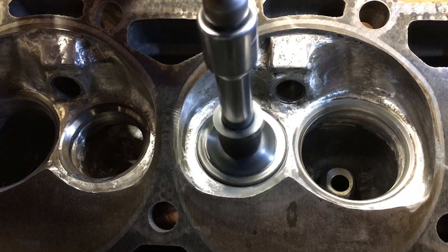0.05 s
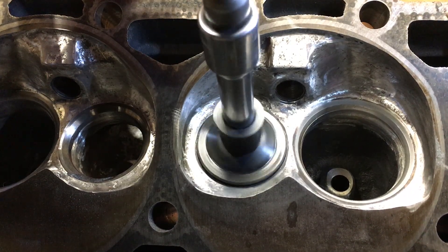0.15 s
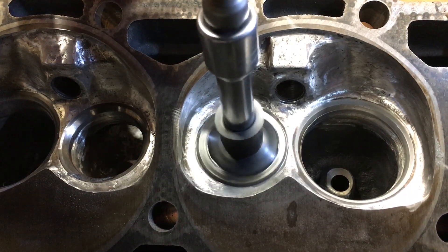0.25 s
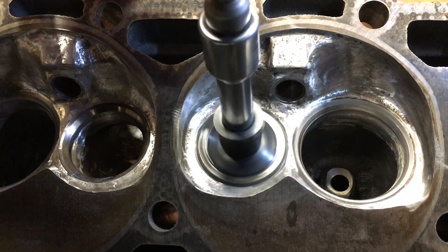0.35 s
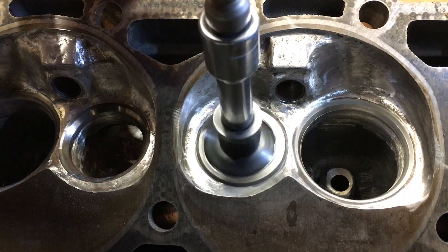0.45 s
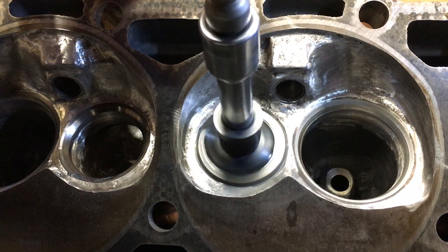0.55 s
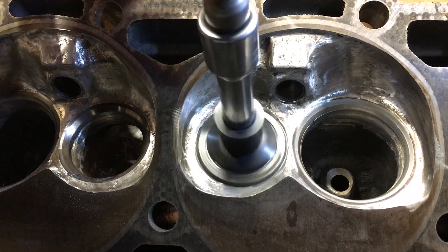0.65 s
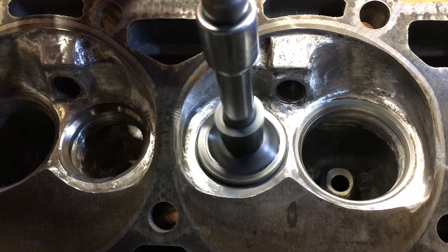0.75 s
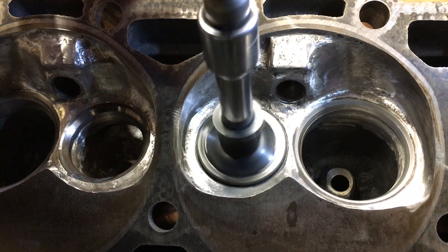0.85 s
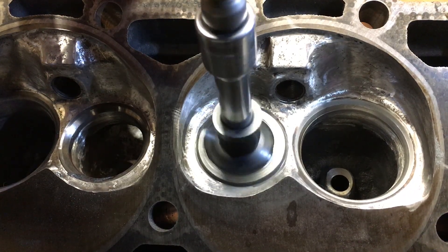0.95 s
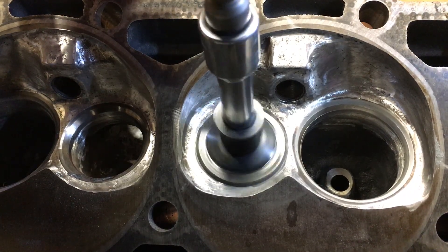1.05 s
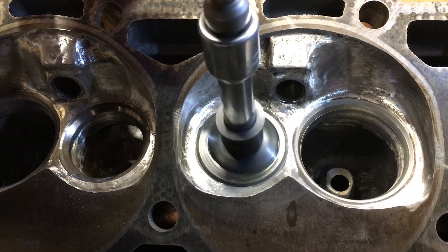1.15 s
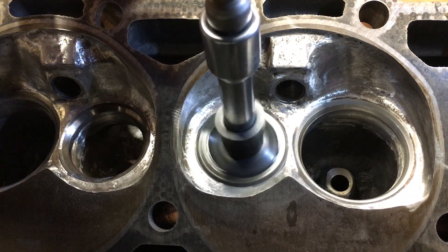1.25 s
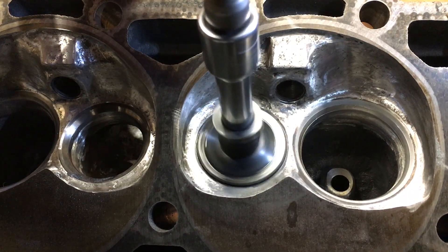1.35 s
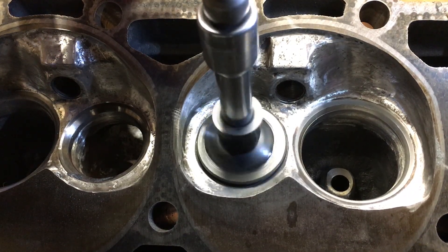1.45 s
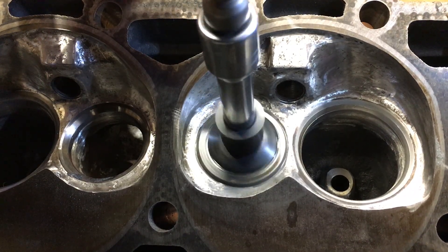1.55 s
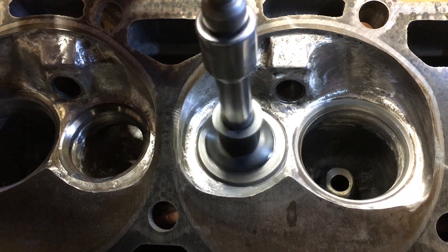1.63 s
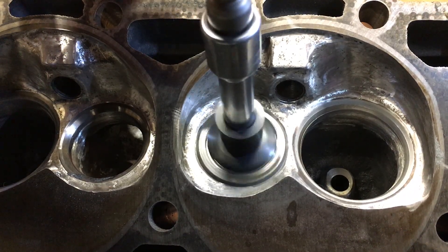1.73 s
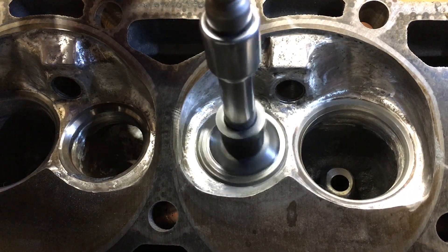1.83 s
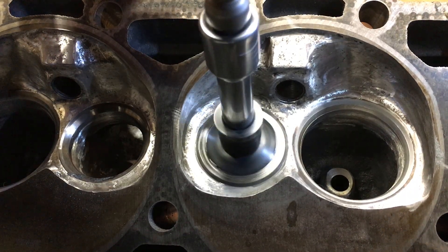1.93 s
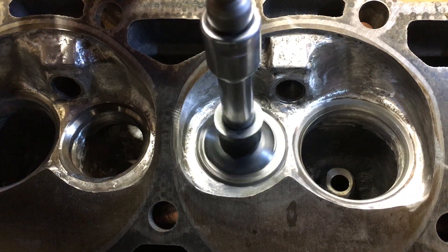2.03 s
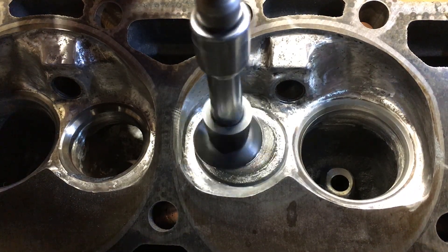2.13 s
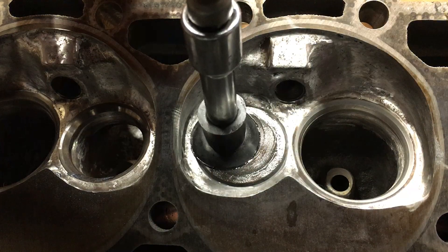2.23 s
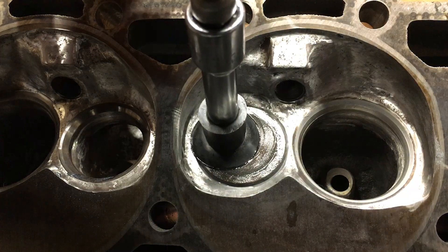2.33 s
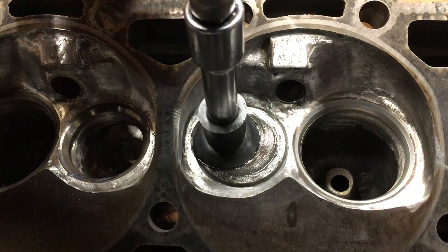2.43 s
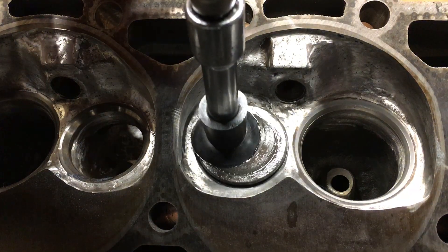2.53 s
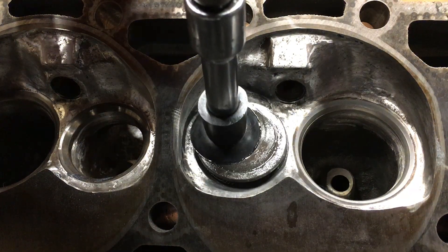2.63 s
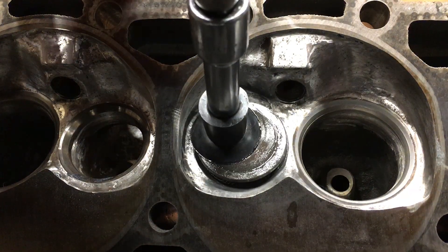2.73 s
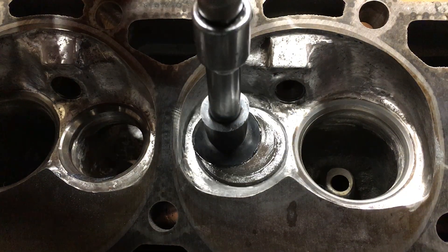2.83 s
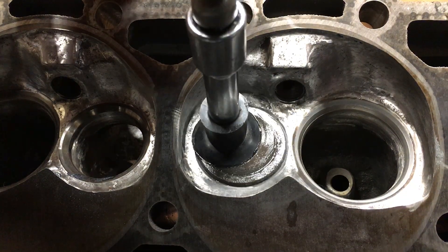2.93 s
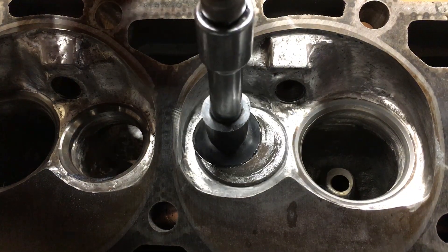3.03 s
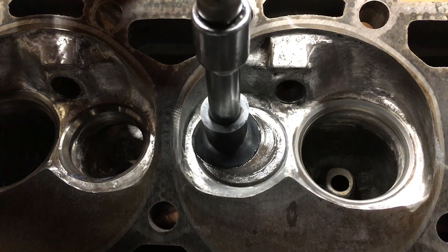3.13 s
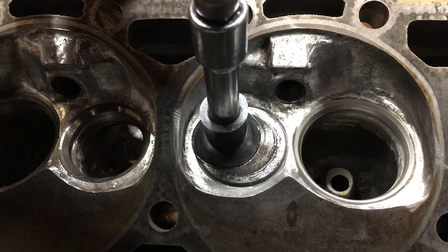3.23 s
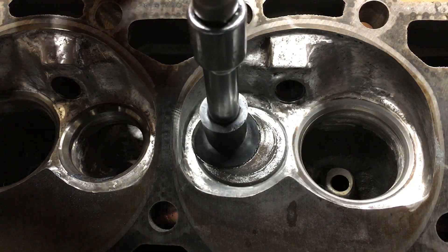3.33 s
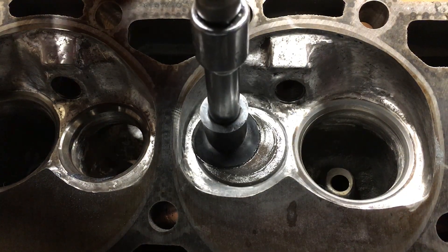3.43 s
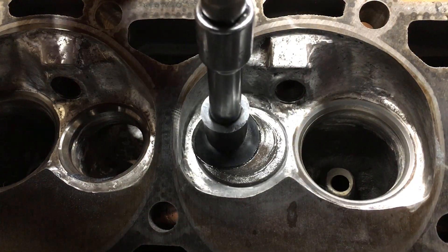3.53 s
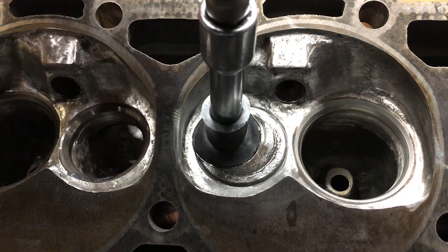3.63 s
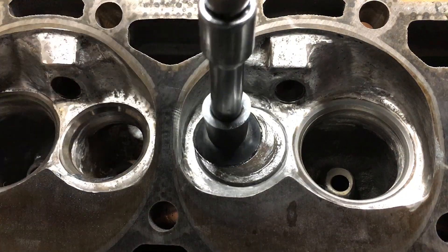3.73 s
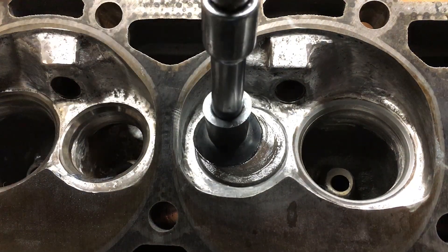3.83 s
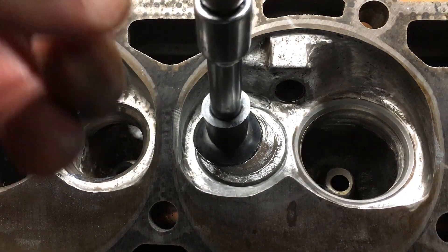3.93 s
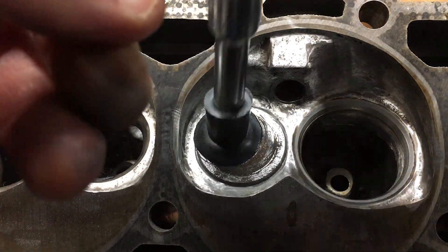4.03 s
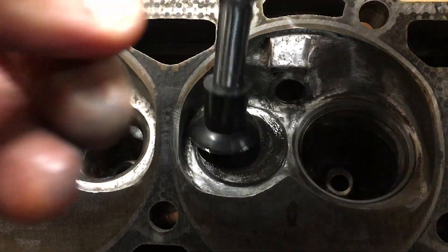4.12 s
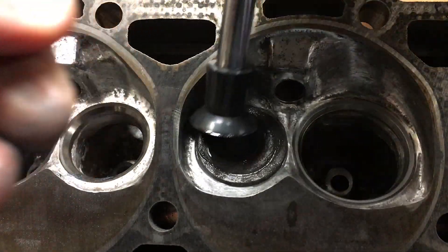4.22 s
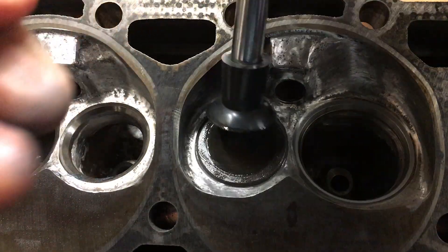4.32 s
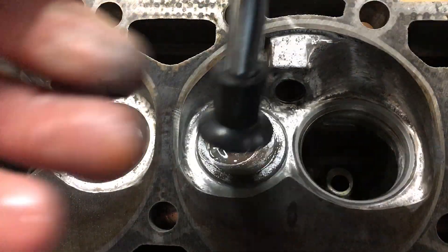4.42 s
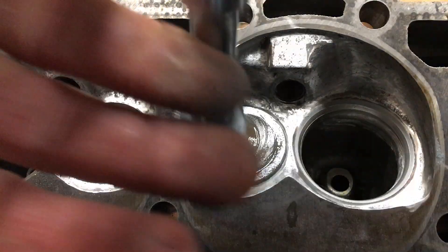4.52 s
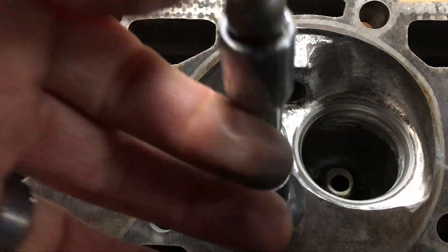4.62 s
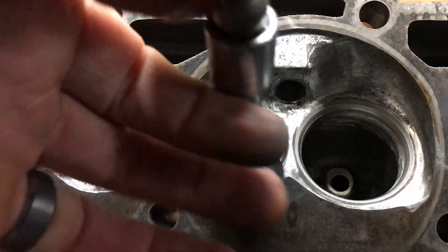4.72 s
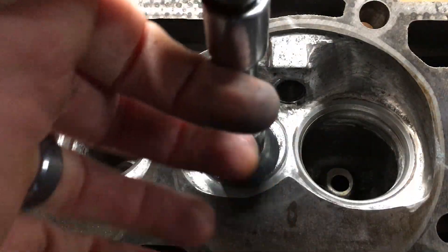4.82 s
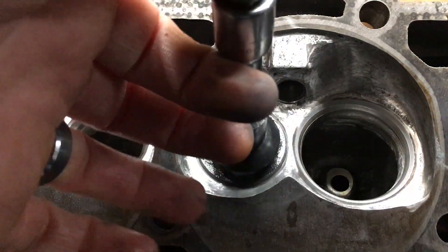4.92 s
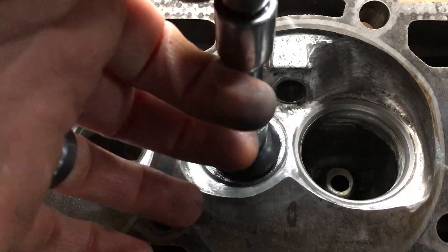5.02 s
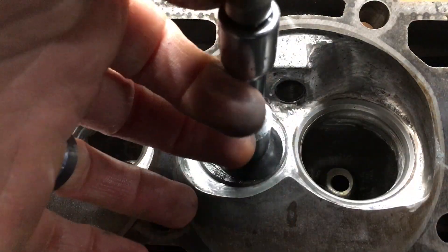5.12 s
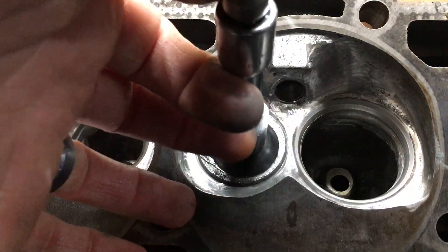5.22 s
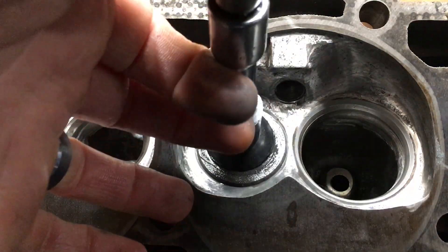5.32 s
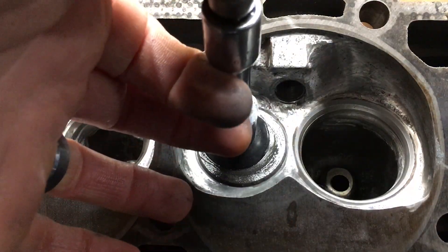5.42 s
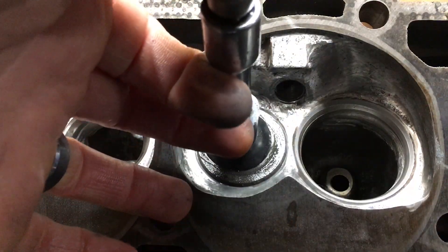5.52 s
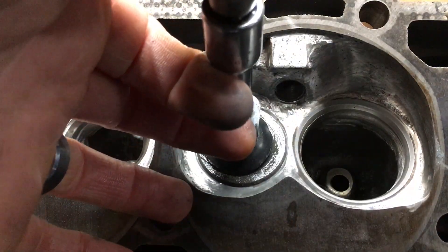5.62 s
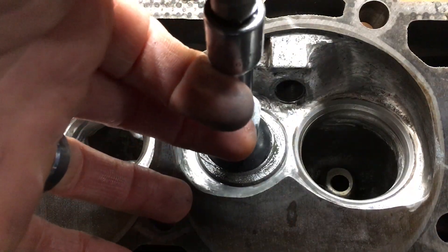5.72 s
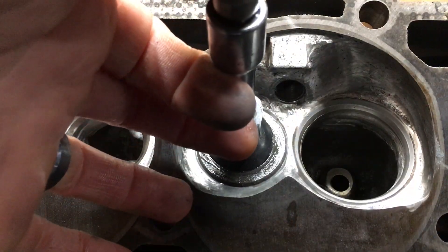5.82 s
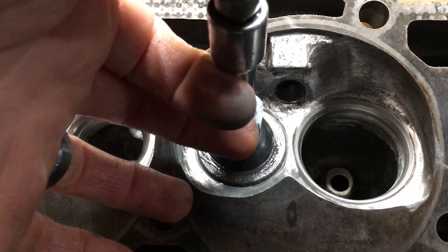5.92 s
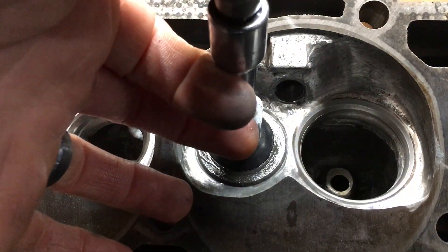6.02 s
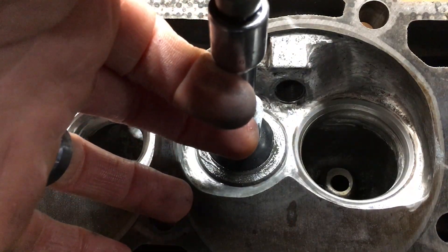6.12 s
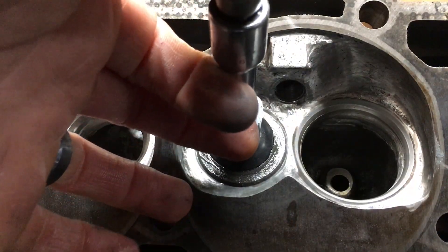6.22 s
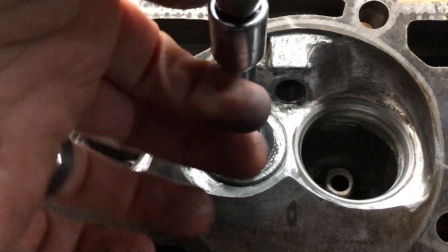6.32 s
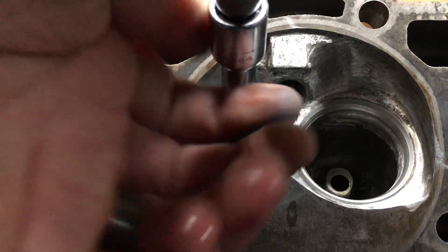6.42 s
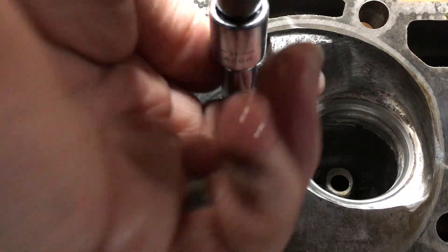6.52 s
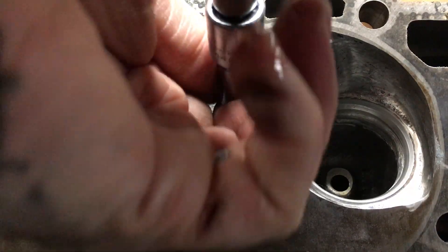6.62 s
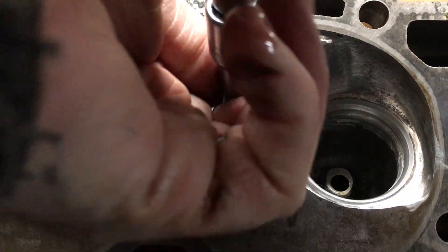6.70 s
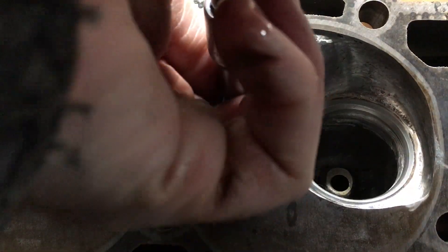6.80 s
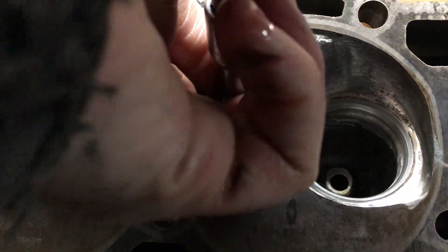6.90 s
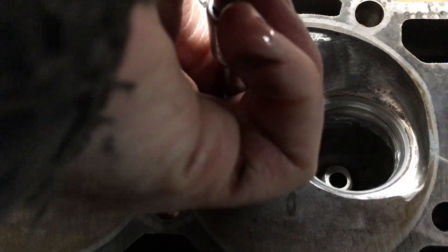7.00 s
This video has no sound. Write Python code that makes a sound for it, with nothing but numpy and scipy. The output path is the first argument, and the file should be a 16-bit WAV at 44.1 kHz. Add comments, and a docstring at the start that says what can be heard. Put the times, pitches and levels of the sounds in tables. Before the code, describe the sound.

A drill slowly spins a valve in an engine cylinder head, its gears whirring and throbbing under a thin, high whistle. With each turn, grinding paste rasps and the motor sags. After about two seconds the drill stops. The valve scrapes in its guide among light knocks and dull bumps, a rubber suction cup pops off twice, and a hand presses it back with faint squelches. Heard up close in a garage.

```python
"""A drill slowly spins a valve through a rubber suction cup, lapping it into a cylinder head.
The gears whirr and throb and the speed control whistles; once a turn the compound bites,
the grit rasps and the motor sags. Then the drill stops: the valve is lifted and scrapes in its guide,
the cup pops off twice, and a hand presses it back on with faint squelches and a rustle of sleeve."""
import sys
import numpy as np
from scipy import signal
from scipy.fft import rfft, irfft
from scipy.io import wavfile

SR = 44100
rng = np.random.default_rng(int(sys.argv[2]) if len(sys.argv) > 2 else 0)


def unload_audio(sound):
    """Save the sound as a 16-bit wav file, at the path given as the first command line argument."""
    columns = np.transpose(np.atleast_2d(sound))
    # keep every value between -1 and 1, then stretch to whole-number steps
    steps = np.round(np.clip(columns, -1, 1) * 32767)
    wavfile.write(sys.argv[1], SR, steps.astype(np.int16))


N = 311346
TIME = np.arange(N) / SR
FREQS = np.fft.rfftfreq(8192, 1 / SR)


def amp(db):
    """Decibels to gain."""
    return 10 ** (np.asarray(db) / 20)


def unit(x):
    """Scales to rms 1."""
    return x / np.sqrt(np.mean(x ** 2) + 1e-20)


def curve(points, hz=FREQS):
    """Joins breakpoints along a log-frequency axis."""
    point_hz, value = np.transpose(points)
    return np.interp(np.log(hz + 1), np.log(point_hz + 1), value)


def bell(hz, width_hz):
    """An EQ bell of height 1."""
    return 1 / (1 + (2 * (FREQS - hz) / width_hz) ** 2)


def add(mix, start_s, sound):
    """Drops a sound into the mix."""
    part = mix[max(round(start_s * SR), 0):][:len(sound)]
    part += sound[:len(part)]


def eq(x, shape_db):
    """Minimum-phase EQ; white noise keeps its power."""
    log_gain = np.log(unit(amp(np.maximum(shape_db, shape_db.max() - 100))))
    mirrored = np.concatenate([log_gain, log_gain[-2:0:-1]])
    taps = np.fft.ifft(np.exp(np.conj(signal.hilbert(mirrored)))).real
    return signal.oaconvolve(x, taps[:len(taps) // 2])[:len(x)]


def resonate(x, hz, width_hz):
    """Two identical resonators in series, brought to rms 1."""
    carrier = np.exp(2j * np.pi * hz * TIME[:len(x)])
    pole = np.exp(-np.pi * width_hz / SR)
    for _ in range(2):
        x = 2 * (carrier * signal.lfilter([1 - pole], [1, -pole], x / carrier + 1e-18)).real
    return unit(x)


def wander(rate_hz):
    """Smooth random modulation of rms 1."""
    hz = np.fft.rfftfreq(N, 1 / SR)
    return unit(irfft(rfft(rng.standard_normal(N)) * np.exp(-(hz / rate_hz) ** 2), N))


def grains(per_s, spread_db):
    """Tiny clicks of uneven size at random moments."""
    size = amp(spread_db * np.minimum(rng.exponential(1, N), 4))
    return unit(size * rng.standard_normal(N) * (rng.random(N) < per_s / SR))


def strokes(rows, rise_db_per_s, fall_db_per_s):
    """Envelope of swells: each fades in, grows or sinks from start to end, and dies away."""
    def stroke(start, end, db, swell_db=0):
        attack_db = rise_db_per_s * np.maximum(start - TIME, 0)
        release_db = fall_db_per_s * np.maximum(TIME - end, 0)
        return amp(db + swell_db * np.interp(TIME, [start, end], [0, 1]) - attack_db - release_db)
    return np.max([stroke(*row) for row in rows], axis=0)


def run_down(stop_s, fall_db_per_s):
    """Full gain until the stop, then a steady fade."""
    return amp(-fall_db_per_s * np.maximum(TIME - stop_s, 0))


# The compound drags on the valve once a turn: start_s, end_s, load (1 = a normal bite)
BITES = [(-.2, .01, .903), (.408, .646, .995), (1.062, 1.303, 1), (1.71, 2.151, 1.099)]

def drill_load(grab_s=0.077, let_go_s=0.124, inertia_s=0.094):
    """The drag of the compound, and the motor's sag, which inertia makes follow late."""
    load = sum(size * np.interp(TIME, [start - grab_s, start, end, end + let_go_s], [0, 1, 1, 0])
               for start, end, size in BITES)
    pole = np.exp(-1 / (inertia_s * SR))
    sag = load[0] + signal.lfilter([1 - pole], [1, -pole], load - load[0])
    return load, sag


# Resonances of the head and seated valve: centre_hz, width_hz, boost_db
HEAD_RESONANCES = [(1156, 370, 1.5), (1650, 220, 3), (2920, 130, 2.5), (3470, 180, 5.5), (3780, 95, 5),
                   (4165, 270, 6.5), (4920, 530, -2.5), (5402, 170, 5), (5700, 510, 5.5), (6660, 90, 2),
                   (6600, 150, 3.5), (7290, 110, 13), (7430, 380, -4), (8340, 190, 3.5), (8890, 95, 6.5),
                   (9430, 830, 5.5), (10500, 70, 4.5), (10560, 520, -9), (11100, 250, 2), (11900, 270, -5)]

def lapping(free_hz=644.5, sag_hz=67.7, cycles_per_gear_turn=25):
    """The running drill: each bite lifts the rasp, bends the whine down and ducks the gears."""
    load, sag = drill_load()
    motor_hz = free_hz - sag_hz * sag
    gear_turns = np.cumsum(motor_hz) / cycles_per_gear_turn / SR
    throb = np.cos(2 * np.pi * (gear_turns - 0.32))  # an uneven gear loads the shaft once a turn
    head_db = sum(db * bell(hz, width) for hz, width, db in HEAD_RESONANCES)
    # trigger released: the valve stops just before the gears
    grit_gain = amp(-32 + 5.5 * load) * run_down(stop_s=2.265, fall_db_per_s=514)
    gear_gain = amp(-24.5 - 2 * sag) * run_down(stop_s=2.2684, fall_db_per_s=470)
    seat = gear_rattle(gear_gain, throb, head_db) + grit_rasp(grit_gain, throb, head_db)
    drill = gear_gain * (gear_housing(throb) + motor_whine(motor_hz, gear_turns))
    return seat + drill + speed_whistle()


# Tone of the gear rattle: freq_hz, gain_db
GEAR_EQ = [(20, -30), (50, -16.5), (120, -18), (170, -18.5), (450, -13.5), (600, -6.5), (950, -4.5),
           (1750, -2), (2100, 0), (4000, -6), (5000, -12), (9000, -21), (16000, -29.5)]

def gear_rattle(gain, throb, head_db):
    """The gears' dense, throbbing rattle sounds through the valve and head."""
    rattle = grains(per_s=16000, spread_db=1.6) * gain
    rattle *= amp(-0.5 + 1.6 * throb + 2.5 * wander(110))
    return eq(rattle, curve(GEAR_EQ) + head_db)


# Coarse grains catching in the seat: peak_s, level_db
CATCHES = [(0.38, -18.5), (0.512, -18), (0.555, -20.5), (1.037, -24), (1.137, -20.5), (1.2, -18.5),
           (1.375, -20.5), (1.452, -21.5), (1.694, -18), (1.742, -14), (1.77, -14.5), (1.949, -17),
           (2.032, -18.5), (2.118, -23)]
# Tone of the crushed grit: freq_hz, gain_db
GRIT_EQ = [(20, -32), (60, -8), (150, -25.5), (500, -17.5), (1100, 6.5), (2200, -2), (3700, 3.5), (5000, 3),
           (8000, 1), (12000, 3.5), (14000, -6), (16000, -8)]

def grit_rasp(gain, throb, head_db, catch_s=0.0044):
    """Grit is crushed in the seat and rings the damped valve; coarse grains add a crunch, brighter around 4
    kHz."""
    grit = grains(per_s=18000, spread_db=2) * gain * amp(0.5 * throb + wander(90))
    catches = sum(amp(db - 2) * np.exp(-((TIME - at) / catch_s) ** 2 / 2) for at, db in CATCHES)
    chatter = gain * amp(-5.5 + 3.5 * (wander(100) + throb / 2))  # smaller grains in between
    coarse = (catches + chatter) * grains(per_s=15000, spread_db=1)
    tone_db = curve(GRIT_EQ) + head_db
    crunch = eq(coarse, tone_db + 12 * bell(3850, 2100))
    ring = valve_ring(damping_per_s=140)
    ringing = signal.oaconvolve(grit, ring / np.linalg.norm(ring))[:N]
    return amp(4) * eq(grit, tone_db) + crunch + amp(-7) * ringing


# Modes of the free valve: pitch_hz, level_db, t60_s
VALVE_MODES = [(1034, 2, .3), (1394, -11, .25), (2137, -1, .07), (2223, -2, .08), (2579, -15, .4),
               (3170, -7, .08), (3290, -7, .1), (3779, -5, .12), (4032, -11, .12), (5265, -3, .12),
               (5600, -7, .08), (5954, -5, .1), (6385, -1, .1), (6770, -3, .07), (7220, -4, .05),
               (7854, -8, .06), (8269, -6, .06), (8818, -6, .06), (8930, -4, .07), (9245, -5, .08),
               (10240, -9, .06), (11197, -10, .06), (12480, -8, .06)]

def valve_ring(damping_per_s=0):
    """The struck valve's ring; the seat's damping, given at 1 kHz, chokes the low modes most."""
    t = TIME[:SR // 2]
    ring = np.zeros(len(t))
    for hz, db, t60 in VALVE_MODES:
        free_decay = amp(db - 60 * t / t60) / np.sqrt(t60)
        choke = np.exp(-damping_per_s * t * 1000 / hz)
        ring += free_decay * choke * np.sin(2 * np.pi * hz * t)
    return ring


def gear_housing(throb):
    """Each throb shakes a narrow ring out of the gear housing."""
    shake = grains(per_s=970, spread_db=3) * amp(4.3 * throb)
    return amp(-9) * resonate(shake, hz=1775, width_hz=140)


def motor_whine(motor_hz, gear_turns, jitter=0.014, roughness=0.45):
    """Three rough motor harmonics, chopped into chirps by the gears, over a faint rotor hum."""
    cycles = np.cumsum(motor_hz * (1 + jitter * wander(60))) / SR
    rotor = np.cos(2 * np.pi * cycles / 5)
    throb_db = 5.5 * np.cos(2 * np.pi * (gear_turns - 0.54))
    accent_db = 5 * np.cos(2 * np.pi * (gear_turns / 2 - 0.77))  # a slower gear: every other throb
    housing = 1 / np.hypot(1, (3 * motor_hz - 1770) / 110)  # harmonic 3 sweeps through a housing mode
    gains = [amp(-14 + accent_db), amp(-7 + throb_db - accent_db / 2), housing * amp(-8 + throb_db / 2)]
    whine = np.zeros(N)
    for harmonic, gain in enumerate(gains, 1):
        flutter = 1 + roughness * (wander(49) + 1j * wander(88))
        whine += gain * (flutter * np.exp(2j * np.pi * harmonic * cycles)).real
    return whine * (1 + 0.31 * rotor) + amp(-30) * rotor


# Path of the speed control's whistle: time_s, pitch_hz, level_db
WHISTLE_PATH = [(0.0, 7145, -35), (0.02, 7110, -38), (0.2, 7150, -27.5), (0.31, 7187, -34),
                (0.46, 7100, -28), (0.76, 7157, -31), (1.01, 7162, -29.5), (1.31, 7077, -28.5),
                (1.4, 7180, -32), (1.68, 7170, -31), (1.82, 7102, -27.5), (1.85, 7180, -33),
                (2.22, 7164, -35.5)]

def speed_whistle(jitter_hz=14, flutter_db=1.27):
    """The speed control chops the current; the windings whistle at that rate until it cuts off."""
    time_s, pitch_hz, level_db = np.transpose(WHISTLE_PATH)
    cycles = np.cumsum(np.interp(TIME, time_s, pitch_hz) + jitter_hz * wander(90)) / SR
    gain = amp(np.interp(TIME, time_s, level_db) + flutter_db * wander(60))
    current = run_down(stop_s=2.225, fall_db_per_s=898)
    return np.sqrt(2) * np.sin(2 * np.pi * cycles) * gain * current


# Soft swells of hiss: start_s, end_s, level_db, swell_db
HISS_SWELLS = [(2.3, 2.62, -58.5, -4), (3.05, 3.37, -64, -0.5), (3.58, 3.82, -63.5, 9.5),
               (4.0, 4.6, -65, 6.5), (4.72, 5.9, -64.5, -11.5), (6.52, 6.71, -60, 0.5),
               (6.8, 7.06, -64, -0.5)]
# Tone of the hiss: freq_hz, gain_db
HISS_EQ = [(88, -41), (150, -10.5), (249, 0.5), (406, -4), (475, -13), (555, -2.5), (759, -10.5),
           (1170, -6.5), (4760, -16.5), (9080, -18.5), (16000, -25)]

def soft_hiss(floor_db=-75, flicker_db=1.1):
    """Swells of hiss: the drill coasts down and the room dies away, then hand and sleeve brush along."""
    gain = np.hypot(amp(floor_db), strokes(HISS_SWELLS, rise_db_per_s=69, fall_db_per_s=55))
    hiss = eq(grains(per_s=8300, spread_db=-1.4), curve(HISS_EQ))
    return hiss * gain * amp(flicker_db * wander(30))


# The drill shifts in the hand: start_s, end_s, level_db
SHIFTS = [(2.54, 2.66, -60.5), (2.94, 3.02, -47), (3.78, 3.86, -43.5), (4.03, 4.12, -44),
          (6.37, 6.45, -62.5)]
# Tone of the rumble: freq_hz, gain_db
RUMBLE_EQ = [(15, -27), (35, -9), (54, 2.5), (75, -3), (110, -5.5), (170, -14), (330, -16.5), (600, -38.5),
             (16000, -93)]

def handling_rumble(floor_db=-63, waver_db=1.4):
    """A low bed of rumble that rises whenever the drill is shifted."""
    gain = np.hypot(amp(floor_db), strokes(SHIFTS, rise_db_per_s=280, fall_db_per_s=59))
    return eq(rng.standard_normal(N), curve(RUMBLE_EQ)) * gain * amp(waver_db * wander(6))


# Hits of cup, socket and valve: start_s, level_db (energy as if spread over 10 ms),
# ring_hz, ring_db, shelf_hz, shelf_db, t60_s
KNOCKS = [(2.503, -48.5, 2560, 18, 3500, -11, 0.02), (2.542, -47.5, 1600, 10.5, 2800, -12, .035),
          (2.642, -58, 1100, 0, 2500, -13, 0.035), (2.966, -32.5, 900, 0.5, 3000, -21, .028),
          (2.998, -42, 3800, 6.5, 7900, -6, 0.02), (3.074, -55, 1000, 6, 2800, -24, 0.018),
          (3.103, -54, 1100, 14, 2500, -18, 0.023), (3.3952, -22, 2594, 4.5, 4500, -6, 0.025),
          (4.003, -49, 4000, 0, 7100, -10, 0.013), (4.1654, -30.5, 13100, 2, 9000, 4, 0.0071),
          (4.167, -24.5, 2900, 2.5, 3350, -15.5, 0.01), (4.426, -40, 2180, 14.5, 7970, 11, 0.012),
          (5.522, -59.5, 1400, 4, 3500, -15.5, 0.021), (6.322, -49, 1546, 11, 2463, -21, 0.015),
          (6.3719, -39.5, 2920, 10, 8000, -4, 0.015), (6.3738, -45, 9050, 20, 11500, -20, 0.0095),
          (6.915, -56, 10070, 6, 13900, -6, 0.05)]
# Tone shared by the hits: freq_hz, gain_db
KNOCK_EQ = [(30, -34.5), (120, -6.5), (320, 0), (600, 3), (1300, 1), (4000, -1.5), (5500, -3.5), (9300, -2),
            (11500, -5.5), (16000, -8.5)]

def knocks_and_pops(cup_hz=340, cup_t60_s=0.026, tail_t60_s=0.078):
    """Each hit is a sharp tick, a thock of the rubber cup and a damped clatter with one broad ring."""
    out, t = np.zeros(N), TIME[:SR // 5]
    thock = amp(-12 - 60 * t / cup_t60_s) * np.cos(2 * np.pi * cup_hz * t)
    for start_s, db, ring_hz, ring_db, shelf_hz, shelf_db, t60 in KNOCKS:
        decay = amp(-60 * t / t60) + amp(-24 - 60 * t / tail_t60_s)
        clatter = rng.standard_normal(len(t)) * decay
        blow = eq(clatter, curve([(400, -5.5), (1200, 1.5)])) + thock  # loose metal has little bass
        blow[0] += 6  # the tick
        treble_db = shelf_db * (1 - 1 / (1 + (FREQS / shelf_hz) ** 4))
        hit = eq(blow, curve(KNOCK_EQ) + treble_db + ring_db * bell(ring_hz, 0.39 * ring_hz))
        add(out, start_s, amp(db) * hit / np.linalg.norm(hit) * np.sqrt(SR / 100))
    return out


# Light taps on the free valve: start_s, level_db
TAPS = [(2.645, -67), (3.111, -55.5)]

def valve_taps():
    """A tap pings the free valve, mostly in its two lowest modes."""
    out = np.zeros(N)
    ping = eq(valve_ring(), curve([(1000, 11), (1400, 13), (2200, -27), (8000, -21)])) / 2
    for start_s, db in TAPS:
        add(out, start_s, amp(db) * ping)
    return out


# Strokes of the stem in its guide: start_s, end_s, level_db, swell_db
SLIDES = [(2.65, 2.73, -52.5, -8), (2.9, 2.95, -56, 8), (3.112, 3.114, -44.5, 3), (3.205, 3.28, -50, 7.5),
          (3.71, 3.86, -50.5, 6), (5.25, 5.9, -79, -4)]

def stem_scrape():
    """The gritty stem scrapes in its guide and rings the valve's free modes."""
    motion = strokes(SLIDES, rise_db_per_s=1100, fall_db_per_s=948)
    rub = grains(per_s=7300, spread_db=4) * motion * amp(1.8 * wander(52))
    tone_db = curve([(200, 11), (1000, -9), (4500, -1.5), (7000, 1),
                     (9500, 0), (10700, 0), (12500, 0.5), (16000, -17)])
    scrape = eq(rub, tone_db + 8 * bell(2190, 200))
    drive = eq(rub, curve([(1200, -3), (2000, 0)]))  # sliding hardly bends the stem
    ring = valve_ring()
    ringing = signal.oaconvolve(drive, ring / np.linalg.norm(ring))[:N]
    return amp(-3) * ringing + amp(-6.5) * scrape


# The hand bumps the drill: start_s, level_db
BUMPS = [(2.918, -42.5), (2.962, -40), (3.398, -42.5), (3.753, -38), (3.806, -48), (3.862, -37.5),
         (3.986, -35.5), (4.046, -44.5), (4.1, -54), (4.168, -42), (6.325, -49), (6.372, -49)]
# Tone of the bumps: freq_hz, gain_db
BUMP_EQ = [(20, -20), (60, 11.5), (130, 0.5), (300, -1), (550, -8), (900, -14.5), (3000, -26.5),
           (16000, -66)]

def hand_bumps(t60_s=0.18):
    """Soft, dull thuds of the hand against the drill."""
    bursts, t = np.zeros(N), TIME[:SR // 3]
    for start_s, db in BUMPS:
        add(bursts, start_s, amp(db - 60 * t / t60_s) * rng.standard_normal(len(t)))
    return eq(bursts, curve(BUMP_EQ))


# Wet rubber pressed on the valve: peak_s, level_db, pitch_hz, half_length_s
SQUELCHES = [(4.385, -57, 7050, 0.032), (4.898, -67, 8300, 0.06), (5.029, -69, 4350, 0.018),
             (5.26, -70, 3200, 0.044), (5.345, -65, 3370, 0.035), (5.359, -59, 3590, 0.018),
             (5.505, -68, 3600, 0.02), (5.633, -72, 3700, 0.041), (5.848, -66.5, 3400, 0.034),
             (5.905, -69, 3400, .045), (6.923, -58, 8960, .02)]

def cup_squelches():
    """Air and paste squeeze out under the rubber lip in short fizzes."""
    out, fizz = np.zeros(N), grains(per_s=3900, spread_db=4)
    for peak_s, db, hz, half_length_s in SQUELCHES:
        start_s = peak_s - half_length_s
        puff = fizz[round(start_s * SR):][:round(2 * half_length_s * SR)]
        puff = resonate(puff, hz, width_hz=0.4 * hz)
        add(out, start_s, amp(db) * puff * np.hanning(len(puff)) ** 2)
    return out


# Reverb time of the garage: freq_hz, t60_s
GARAGE_DECAY = [(100, 0.71), (1000, 0.42), (4000, 0.31), (14000, 0.32)]

def garage(x, wet_db=-23, echoes_per_s=3000, predelay_s=0.005):
    """Adds a faint tail of sparse reflections, each band dying at its own speed."""
    echoes = rng.standard_normal(SR) * (rng.random(SR) < echoes_per_s / SR) * (TIME[:SR] > predelay_s)
    hz, t, bands = signal.stft(echoes, SR, nperseg=256)
    decay = amp(-60 * t / curve(GARAGE_DECAY, hz)[:, None])
    tail = signal.istft(bands * decay, SR, nperseg=256)[1]
    return x + amp(wet_db) * signal.oaconvolve(x, tail / np.linalg.norm(tail))[:N]


def scene():
    """The workbench up close, in mono: the valve work gets reverb, handling and hiss stay dry."""
    work = lapping() + stem_scrape() + valve_taps() + knocks_and_pops() + cup_squelches()
    return (garage(work) + hand_bumps() + handling_rumble() + soft_hiss())[None]


def record(dry, cutoff_hz=15900):
    """A steep low-pass trims the very top."""
    lowpass = signal.firwin(511, cutoff_hz, window=("kaiser", 9), fs=SR)
    return signal.oaconvolve(dry, lowpass[None], "same")


dry = scene()
out = record(dry)
unload_audio(out)
```